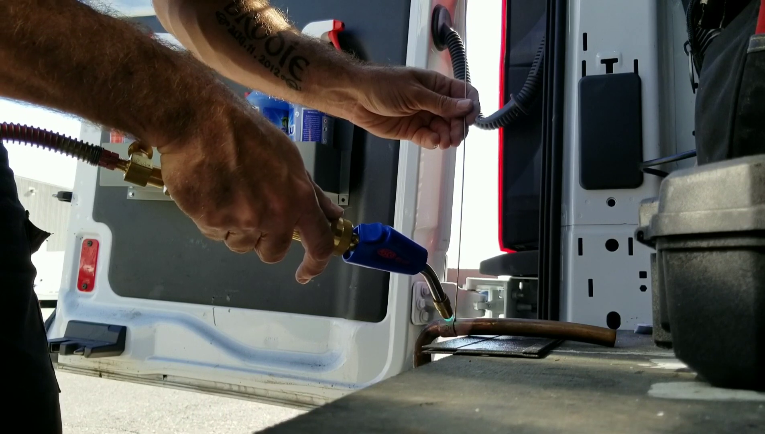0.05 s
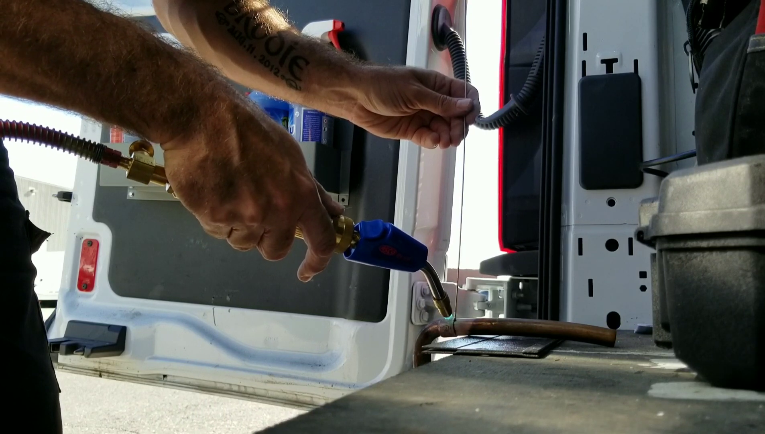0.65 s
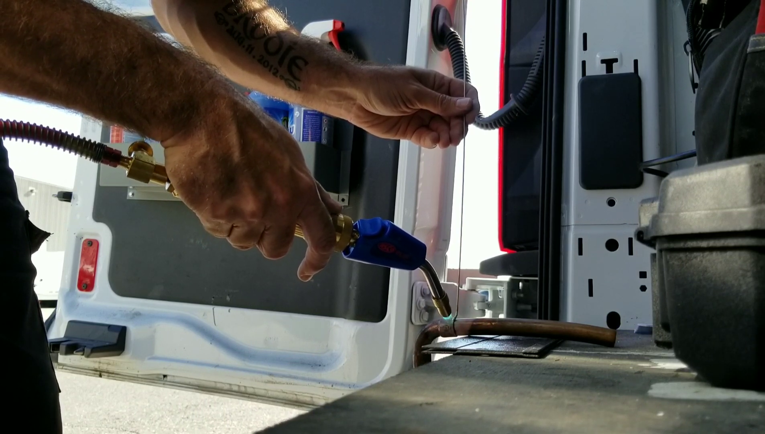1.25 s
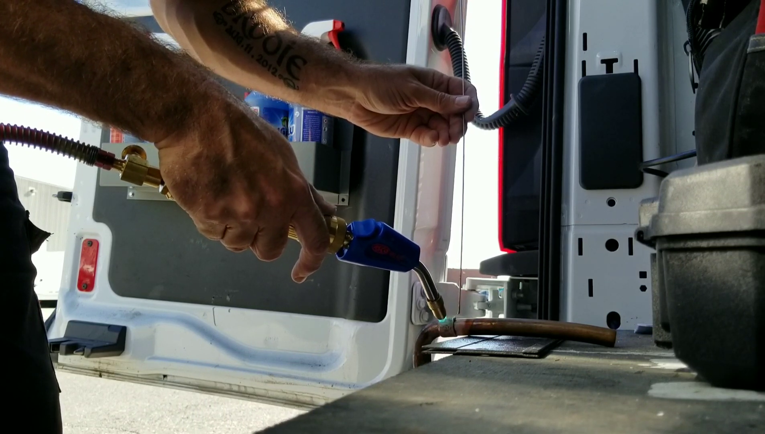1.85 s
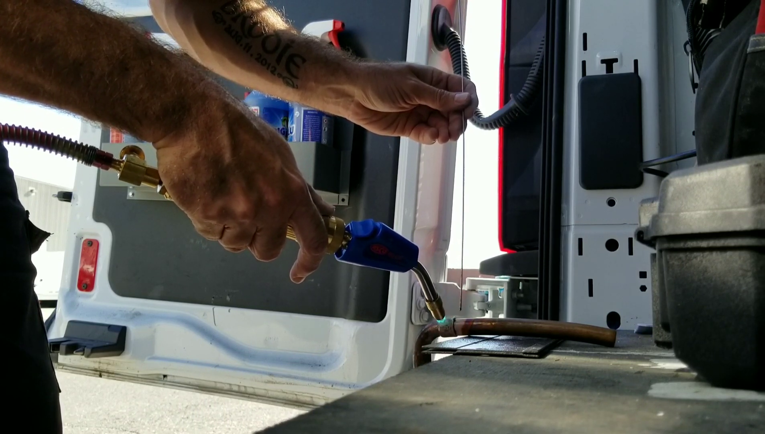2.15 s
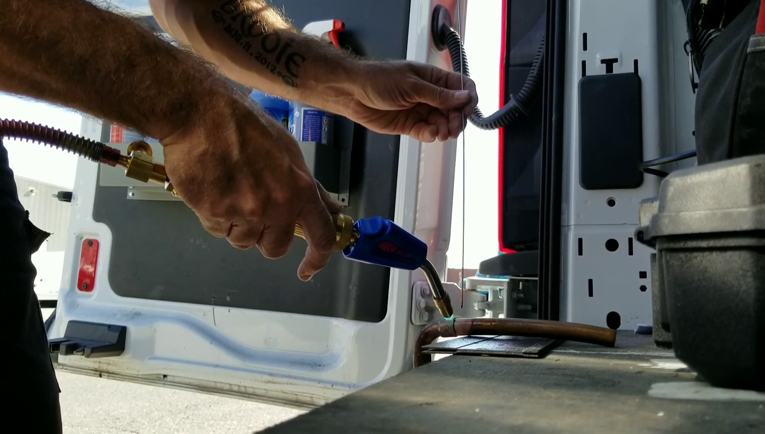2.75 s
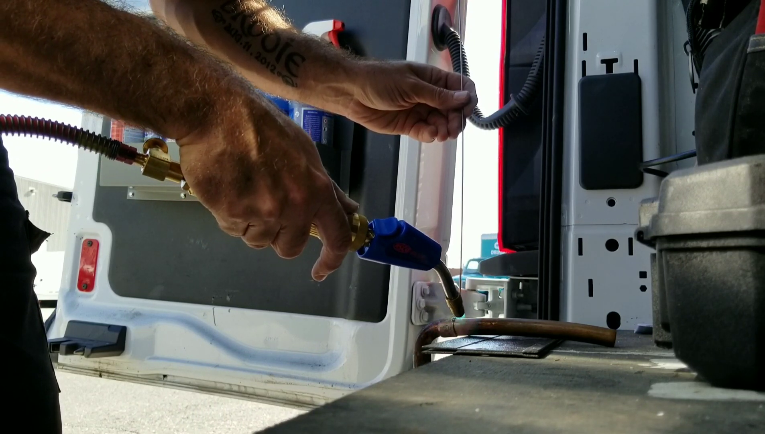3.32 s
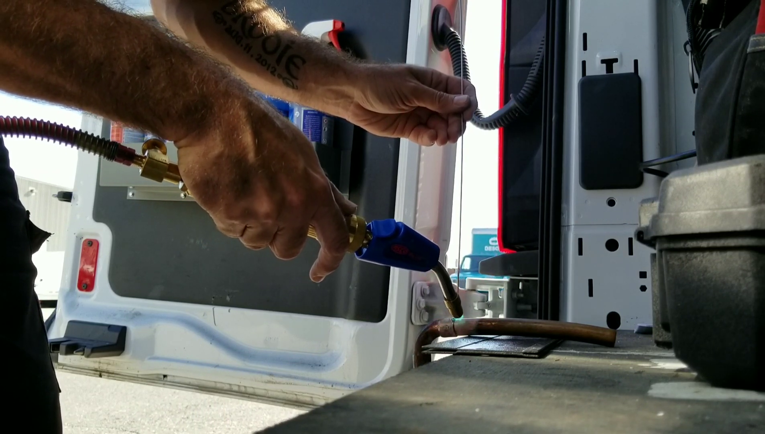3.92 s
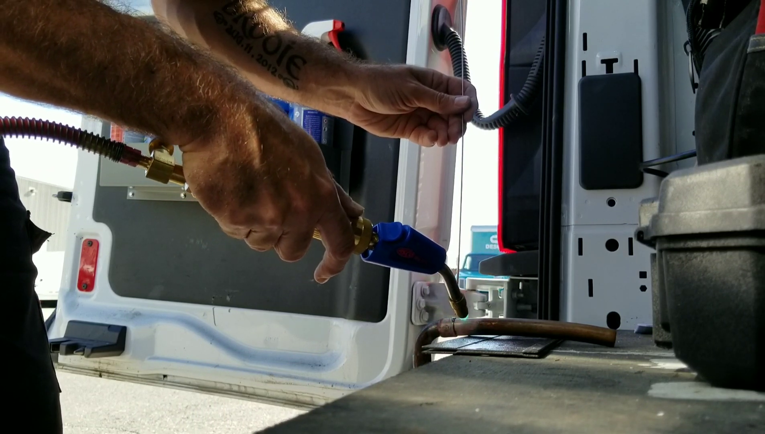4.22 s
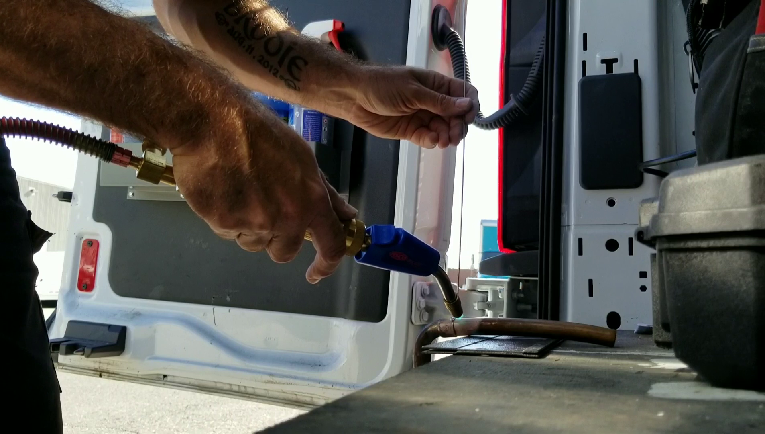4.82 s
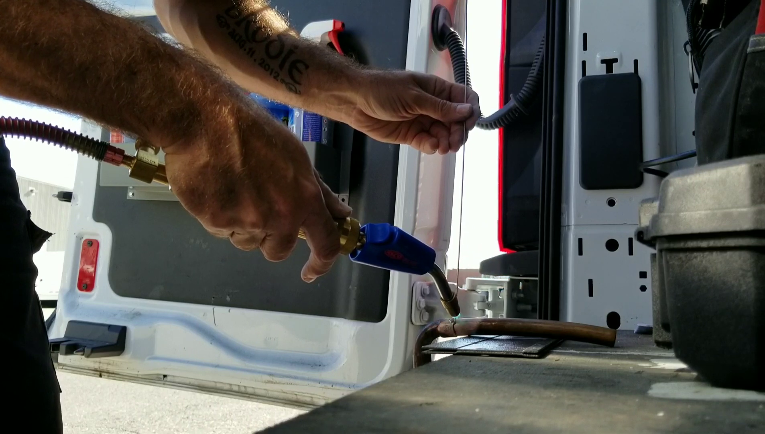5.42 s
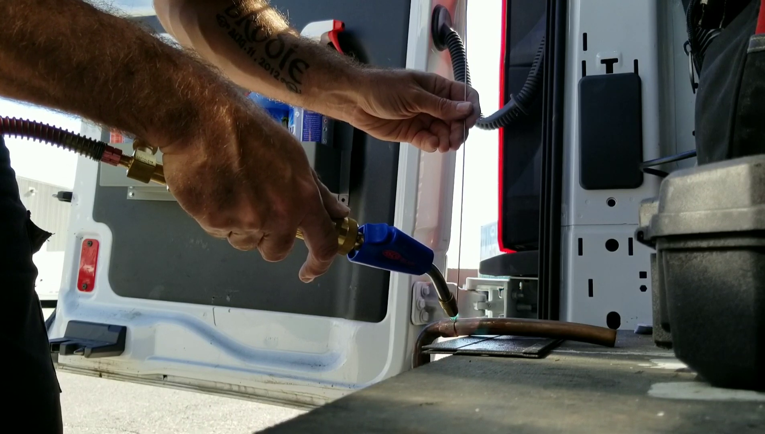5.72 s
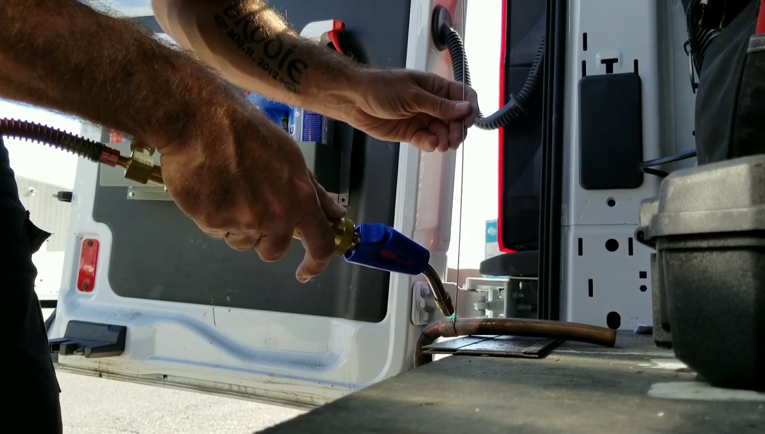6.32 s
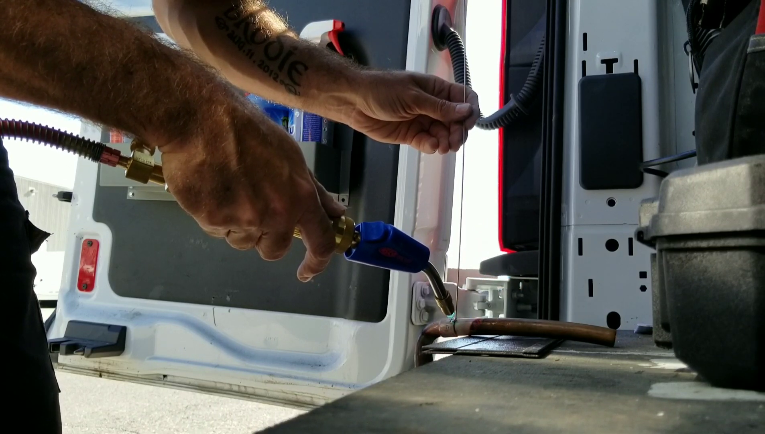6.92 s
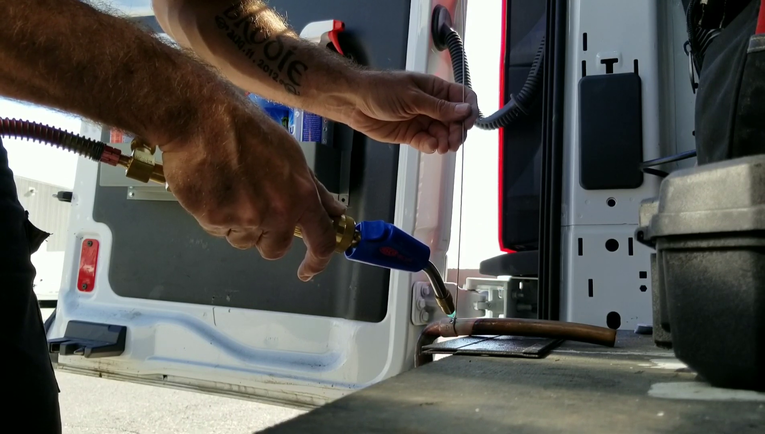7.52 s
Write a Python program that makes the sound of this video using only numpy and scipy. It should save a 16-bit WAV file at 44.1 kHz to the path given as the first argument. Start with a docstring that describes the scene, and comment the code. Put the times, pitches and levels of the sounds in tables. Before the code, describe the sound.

A gas torch burns close by, heating a copper pipe on the floor of an open van. Its flame makes a steady roar and a bright hiss, with a high, piercing whistle that holds nearly one pitch but sputters, drops out briefly and returns. Faint traffic rumbles outside, and a distant engine revs early on, then eases off. The van's bare walls add a slight colour.

```python
"""Whistling torch in a work van

An air-acetylene torch heats a copper pipe on the floor of an open van. The flame roars, the jet
hisses, and the tip whistles near 3.65 kHz, faltering as the flame shifts on the pipe.
The bare walls colour the sound; outside, traffic rumbles and one engine revs and eases off."""
import sys
import numpy as np
from scipy import signal
from scipy.fft import rfft, irfft, next_fast_len
from scipy.io import wavfile
from scipy.ndimage import uniform_filter1d, map_coordinates

SR = 44100
rng = np.random.default_rng(int(sys.argv[2]) if len(sys.argv) > 2 else 0)


def wav_record(signal):
    """Record a signal, one row per channel, as 16-bit PCM in the file named by sys.argv[1]."""
    frames = np.transpose(np.atleast_2d(signal))
    bounded = np.clip(frames, -1, 1)
    # unit amplitude maps onto the largest positive 16-bit level
    quanta = np.round(bounded * 32767).astype(np.int16)
    wavfile.write(sys.argv[1], SR, quanta)


N = 333396


def amp(db):
    """Decibels to gain."""
    return 10 ** (np.asarray(db) / 20)


def unit(x):
    """Scale to rms 1."""
    return x / np.sqrt(np.mean(x ** 2) + 1e-20)


def along(points, hz):
    """Read each column after the frequency at hz, on a log axis."""
    f, *cols = np.transpose(points)
    return np.array([np.interp(np.log(hz + 1), np.log(f + 1), c) for c in cols])


def curves(rows):
    """Automation: one value per sample for each column after the time."""
    times, *cols = np.transpose(rows)
    return [np.interp(np.arange(N) / SR, times, c) for c in cols]


def wobble(rate):
    """A smooth random curve, rate knots a second."""
    knots = rng.standard_normal(int(N * rate / SR) + 4)
    return map_coordinates(knots, [np.arange(N) * rate / SR])


def filtered(x, response):
    """Equalise x by a gain that is a function of frequency."""
    m = next_fast_len(N + SR // 2)
    return irfft(rfft(x, m) * response(np.fft.rfftfreq(m, 1 / SR)), m)[..., :N]


def rush(spectrum):
    """Turbulent stereo noise of rms 1, shaped by a spectrum and rippled by standing waves."""
    # stereo image: f/Hz, left-right correlation
    likeness = [(60, .9), (140, .9), (300, .82), (700, .98), (1400, .3), (3100, .48), (6500, .98),
                (7200, .09), (15000, .02)]
    # phase by which the left leads: f/Hz, lead/rad
    lead = [(100, 0), (700, -1), (950, 2.05), (1400, 0), (2400, 0), (3300, -2.4), (3650, -1), (3950, -1.34),
            (4400, -1.25), (5000, -1.44), (5500, .5), (6050, -3), (6800, 1)]
    # standing waves in the tip and between the van's panels: f/Hz, gain/dB
    standing_waves = [(861, 2.5), (2310, 2.5), (2600, -9), (2830, 5), (3045, 6), (3120, -1.5), (3205, 8),
                      (3880, -15), (4205, -2), (4337, 1.5), (4560, 1), (4870, -3), (5130, 1), (5540, 3.5),
                      (5700, -4), (5841, -8), (5950, 1.5), (6050, 1.5), (6143, -3), (6230, 0), (6333, 2),
                      (6450, -9), (6552, 3.5), (7420, 9), (7640, 1), (8500, 1)]
    sigma_hz = 33
    m = next_fast_len(N)
    hz = np.fft.rfftfreq(m, 1 / SR)
    mid, side = rfft(rng.standard_normal((2, m)))
    signs = np.array([[1], [-1]])
    spread = np.arccos(np.clip(along(likeness, hz), -1, 1)) / 2
    noise = np.cos(spread) * mid + signs * np.sin(spread) * side
    grid = hz[::16]
    ripple_db = sum(db * np.exp(-.5 * ((grid - f) / sigma_hz) ** 2) for f, db in standing_waves)
    colour = amp(along(spectrum, hz) + np.interp(hz, grid, ripple_db))
    phase_shift = np.exp(.5j * signs * along(lead, hz))
    return unit(irfft(noise * colour * phase_shift, m)[:, :N])


def walls(x, count=14, echo_db=-11, first_s=.004, span_s=.018):
    """Weak echoes from the van's floor and panels comb the noise, differently left and right."""
    out = x.copy()
    for side in range(2):
        for place, sign in zip(rng.random(count), rng.choice([-1, 1], count)):
            lag = int(SR * (first_s + span_s * place))
            out[side, lag:] += sign * amp(echo_db) / np.sqrt(count) * x[side, :N - lag]
    return out


def traffic():
    """A bed of low street rumble, slowly swelling and ebbing."""
    # the rumble's swell: t/s, level/dB
    swell = [(0, -45), (.8, -40), (2.1, -38), (2.9, -41.5), (3.8, -40), (4.6, -42), (5.3, -40),
             (7.56, -41.5)]
    # its colour: f/Hz, left/dB, right/dB
    spectrum = [(22, -21.7, -20.9), (45, -8, -11), (74.4, 0.5, 0.5), (90, -2, -4), (111, 0.5, 0.5),
                (239, -2.5, -4.5), (261, -13.5, -13.5), (420, -42, -53)]
    return amp(curves(swell)[0] + 0.17 * wobble(3.5)) * rush(spectrum)


def engine():
    """A distant engine revs and eases off, droning at its firing rate and the octave above."""
    # the revs: t/s, firing rate/Hz, level/dB
    revs = [(0, 114.6, -56), (.45, 165, -52), (.65, 177.6, -37), (1.0, 172, -42), (1.3, 165.7, -54),
            (1.5, 165.5, -42.5), (1.85, 158, -43), (2.35, 147, -39.5), (2.6, 145, -50), (3.1, 186.7, -49.5),
            (4.8, 195, -58.5)]
    firing_hz, level_db = curves(revs)
    phase = 2 * np.pi * np.cumsum(firing_hz + 3 * wobble(25)) / SR
    drone = np.sin(phase) + amp(-12) * np.sin(2 * phase)
    return np.sqrt(2) * amp(level_db + 2.2 * wobble(20)) * drone


def flame_roar(eddies_db, boost_db=3):
    """Burning gas roars in the midrange, fluttering with the eddies."""
    # the burn, before the boost: t/s, level/dB
    burn = [(0, -37.5), (1, -36), (2.3, -35.3), (3.3, -36.5), (4.5, -35), (5.8, -34.5), (6.7, -35.5),
            (7.56, -35.5)]
    # the roar's colour: f/Hz, left/dB, right/dB
    spectrum = [(190.5,-50,-52), (294,-13,-9), (470,-2,-7), (598,-10,-9.5), (918,-0.5,-0.5), (920,-4,-10.5),
                (1243,-26,-11), (1530,1.5,-1.5), (1490,-12,-8.5), (2110,1,-3), (2280,-4.5,-6.5),
                (3170,-9,-5.5), (3880,-38,-42)]
    level_db = curves(burn)[0] + boost_db + 0.75 * eddies_db + 0.15 * wobble(5.8)
    return amp(level_db) * rush(spectrum)


def jet_hiss(strength, eddies_db, stir_db=3, pivot_hz=5000):
    """The gas jet hisses, louder as the whistle stirs it; its angle on the pipe tilts the treble."""
    # the hiss while the tip is silent: t/s, level/dB
    bed = [(0.0, -25), (0.54, -26.1), (1.08, -24), (2.34, -23), (2.52, -24.5), (2.7, -22), (3.42, -24),
           (4.86, -22.5), (5.04, -24.5), (5.76, -22), (6.66, -23.5), (7.56, -23)]
    # its colour: f/Hz, left/dB, right/dB
    spectrum = [(2500,-60,-67), (3140,-22,-24), (3500,-5.5,-5), (4200,-8.5,-2), (4640,-3,-8),
                (5070,-6.5,-10), (5200,-2,-7), (5280,-14.5,-18), (5630,-2.5,-11.5), (6090,4,-6.5),
                (6110,1,-8.5), (6650,-4.5,-13), (6790,-17,-9), (8000,-49,-52)]
    # brightness from the jet's angle: t/s, tilt/dB
    brightness = [(0, 0.5), (1, 1.8), (2.8, 1), (3.8, 2), (4.25, -1.5), (4.8, -0.5), (5.1, 0.5), (5.8, 0),
                  (7.4, -0.5)]
    noise = rush(spectrum)
    upper = filtered(noise, lambda hz: (1 + np.tanh((hz - pivot_hz) / 400)) / 2)
    tilt_db = curves(brightness)[0] + 0.83 * wobble(22)
    tilted = amp(tilt_db / 2) * upper + amp(-tilt_db / 2) * (noise - upper)
    return amp(curves(bed)[0] + stir_db * strength + eddies_db) * tilted


def jet_fizz(strength, eddies_db, stir_db=3):
    """The jet's airy top end, also stirred by the whistle."""
    # the fizz while the tip is silent: t/s, level/dB
    bed = [(0.0, -33.5), (1.98, -30), (2.52, -31.5), (3.42, -30), (3.6, -31.5), (4.14, -29), (4.86, -30),
           (5.04, -31.5), (7.56, -33.5)]
    # its colour: f/Hz, left/dB, right/dB
    spectrum = [(6300,-63,-56), (7070,-8,-10), (7780,-8,-13.5), (8130,5.5,-10), (8350,-6.5,-13),
                (8530,1,-15), (8870,-6,-23), (8800,-4.5,-12), (10030,-12.5,-23), (11200,-11.5,-26),
                (12200,-10.5,-25), (12700,-13,-28), (14300,-16,-31), (15900,-21,-30)]
    level_db = curves(bed)[0] + stir_db * strength + 0.55 * eddies_db + 0.7 * wobble(30)
    return amp(level_db) * rush(spectrum)


def patchy(x, depth_db):
    """Passing eddies favour narrow bands of the hiss for some tens of milliseconds."""
    bands = signal.stft(x, nperseg=512)[2]
    patches = uniform_filter1d(rng.standard_normal(bands.shape[1:]), size=3, axis=0)
    patches = unit(uniform_filter1d(patches, size=7, axis=1))
    taper = np.interp(np.fft.rfftfreq(512, 1 / SR), [8500, 10000], [1, .3])
    return signal.istft(bands * amp(depth_db * taper[:, None] * patches), nperseg=512)[1][:, :N]


def overblow(loose, pitch_hz=5190, ring_db=-39.5, flicker_db=5.5, flare_sigma_s=0.016):
    """A higher resonance of the tip flickers while the whistle is loose, and now and then flares."""
    # the flares: t/s, level/dB
    chirps = [(1.002, -28), (1.2, -27), (1.294, -29), (6.465, -29), (7.157, -28)]
    t = np.arange(N) / SR
    flicker = loose * amp(ring_db + flicker_db * wobble(60))
    flares = sum(amp(db) * np.exp(-.5 * ((t - s) / flare_sigma_s) ** 2) for s, db in chirps)
    phase = 2 * np.pi * np.cumsum(pitch_hz + 55 * wobble(400)) / SR
    return np.sqrt(2) * (flicker + flares) * np.sin(phase) * amp([[1], [-4]])


def grip(collapse_s=0.014, regrow_s=0.024):
    """The whistle's envelope in dB: it follows the drive, but collapses and regrows at each break."""
    # how hard the jet drives the tip as the hand moves the torch: t/s, level/dB
    drive = [(0.0, -11.5), (0.19, -17), (0.77, -17), (0.85, -12.0), (1.54, -14), (1.72, -20), (2.29, -10.5),
             (3.19, -12.5), (3.83, -11), (4.02, -17.5), (4.39, -15), (4.49, -10.5), (5.27, -22.5),
             (5.77, -11), (6.68, -10), (6.78, -22.5), (7.36, -9.5), (7.56, -16)]
    # the flame shifts on the pipe and the whistle breaks off: start/s, length/s, depth/dB
    breaks = [(0.02, 0.061, 7.5), (0.254, 0.036, 24), (0.461, 0.061, 11), (0.523, 0.15, 29),
              (0.767, 0.072, 23), (0.984, 0.051, 17), (1.082, 0.09, 7.0), (1.183, 0.077, 16),
              (1.284, 0.0416, 14), (1.837, 0.11, 21), (2.428, 0.13, 7.0), (3.345, 0.17, 5.0),
              (3.603, 0.042, 7), (4.01, 0.026, 13), (4.1, 0.029, 10), (4.159, 0.021, 27),
              (4.775, 0.025, 15.5), (5.067, 0.282, 10.0), (5.342, 0.066, 11), (5.521, 0.15, 21),
              (6.354, 0.15, 21), (6.595, 0.11, 8.5), (6.798, 0.085, 10), (6.888, 0.07, 13),
              (6.956, 0.095, 14.5), (7.079, 0.036, 32), (7.139, 0.032, 20)]
    t = np.arange(N) / SR
    lost_db = np.zeros(N)
    for start, length, depth in breaks:
        ramp = np.minimum((t - start) / collapse_s, (start + length - t) / regrow_s)
        lost_db = np.maximum(lost_db, depth * np.clip(ramp, 0, 1))
    return curves(drive)[0] - lost_db


def sags(rate, scale_db, recovery_s):
    """Stray eddies knock the whistle down at once, and it regrows: dB about a mean of 0."""
    knocks = (rng.random(N) < rate / SR) * np.minimum(rng.exponential(size=N), 2)
    t = np.arange(SR // 5) / SR
    dip = (1 - np.exp(-t / .0008)) * np.exp(-t / recovery_s)
    drop = signal.fftconvolve(knocks, dip)[:N]
    return scale_db * (drop.mean() - drop)


def oscillation(level_db, loose, sputter_db=5, ceiling_db=-10):
    """The whistle's gain: eddies shake it, it sputters when loose and saturates when strong."""
    flutter_db = 1.5 * (.55 * wobble(38) + wobble(80) + 0.58 * wobble(220))
    flutter_db += sputter_db * loose * wobble(48)
    flutter_db += sags(rate=13, scale_db=10.5, recovery_s=0.0026)  # small eddies: quick nicks
    flutter_db += sags(rate=7, scale_db=4, recovery_s=0.016)  # large eddies: longer catches
    drive = amp(level_db + flutter_db)
    return drive / (1 + (drive / amp(ceiling_db)) ** 4) ** (1 / 4)


def whistle(level_db, strength, loose, flatten_hz=11, echo_db=-25, breath_db=-13.5):
    """The jet locks onto the tip's resonance, singing flatter when strong and rougher when loose."""
    # the tip's resonance drifts with its heat: t/s, f/Hz
    resonance = [(0.0, 3610), (0.18, 3677), (1.44, 3620), (1.62, 3648), (2.16, 3680), (2.34, 3658),
                 (3.42, 3660.0), (3.78, 3633), (4.32, 3665), (4.86, 3673), (5.04, 3690), (7.56, 3671.0)]
    # the tip's aim sweeps standing waves past the listener: t/s, left over right/dB
    aim = [(0.0, -13), (0.36, -5.5), (0.96, -10), (2.16, -7), (2.4, -14), (2.52, -5), (2.76, -10),
           (3.12, -13), (3.24, -26), (3.48, -9), (3.84, -15), (4.08, -9), (4.56, -18), (5.04, -7),
           (7.56, -6)]
    # jet noise stirred up around the pitch and its octave: f/Hz, left/dB, right/dB
    breath = [(2150, -24.5, -34), (2740, -20.5, -14), (3194, -7.5, -10.5), (3420, -19, -21),
              (3390, -20, -13), (3625, -22, 11), (3480, -15, 5), (3690, -2.5, -20), (3900, -13, 3),
              (4070, -28, -15), (5160, -48, -43), (6740, -16.5, -15), (7300, -13, -11), (8260, -40, -44)]
    pitch_hz = curves(resonance)[0] - flatten_hz * strength
    pan_db = curves(aim)[0] + 3.0 * wobble(9.8)
    jitter_hz = 4 * wobble(18) + (8 + 14.8 * loose) * (wobble(110) + 1.44 * wobble(450))
    phase = 2 * np.pi * np.cumsum(pitch_hz + jitter_hz) / SR
    gain = oscillation(level_db, loose)
    pan = amp(np.array([pan_db, -pan_db]) / 2)
    pan /= np.sqrt(np.mean(pan ** 2, axis=0))
    tone = pan * np.exp(1j * (phase + np.array([[.25], [-.25]])))
    # wall echoes arrive with stale phase and make the tone shimmer on each side
    shimmer = np.array([wobble(75) + 1j * wobble(90) for side in range(2)]) * np.exp(1j * phase)
    sung = np.sqrt(2) * (tone + amp(echo_db) * shimmer).real
    return gain * (sung + amp(breath_db) * rush(breath))


def scene(full_db=-10, loose_below_db=-21, knee_db=3.5):
    """The torch up close, the street behind; the whistle's envelope steers the jet and the overblow."""
    level_db = grip()
    strength = amp(level_db - full_db)  # 0 silent, 1 full
    loose = 1 / (1 + np.exp((level_db - loose_below_db) / knee_db))  # 0 locked, 1 barely sounding
    eddies_db = 0.87 * wobble(15) + 0.76 * wobble(90)
    roar = flame_roar(eddies_db)
    hiss = jet_hiss(strength, eddies_db)
    fizz = jet_fizz(strength, eddies_db)
    flame = walls(roar) + patchy(walls(hiss) + fizz, depth_db=0.92)
    return flame + whistle(level_db, strength, loose) + overblow(loose) + engine() + traffic()


def record(dry, top_hz=15820):
    """A brick-wall low-pass trims the very top of the mix."""
    return filtered(dry, lambda hz: hz < top_hz)


dry = scene()
out = record(dry)
wav_record(out)
```